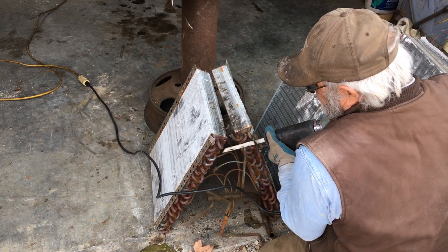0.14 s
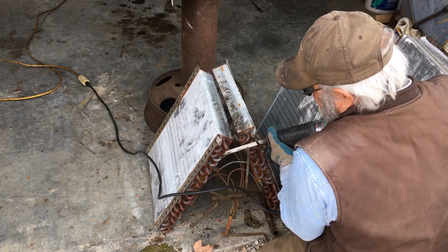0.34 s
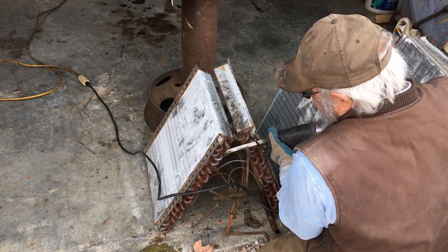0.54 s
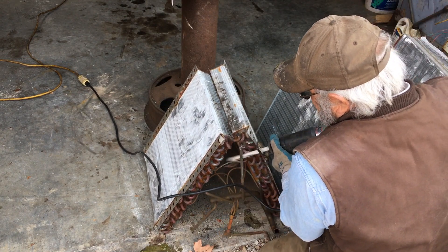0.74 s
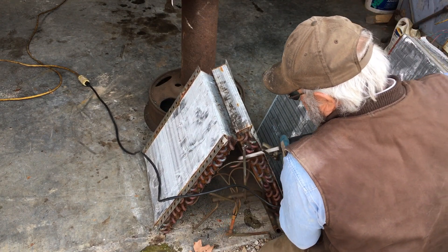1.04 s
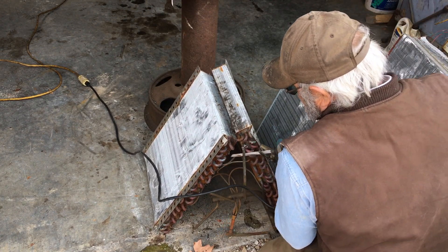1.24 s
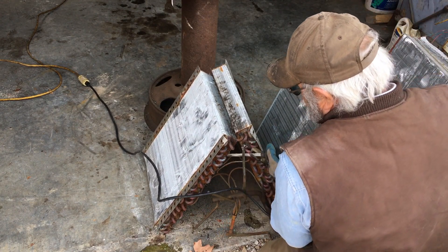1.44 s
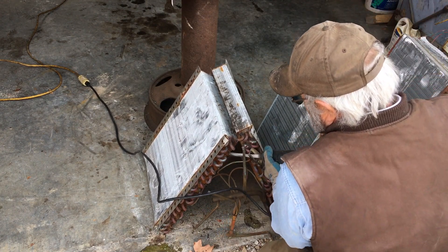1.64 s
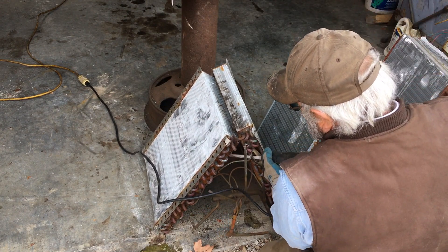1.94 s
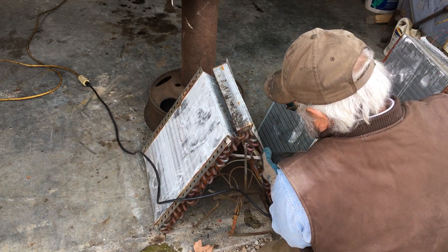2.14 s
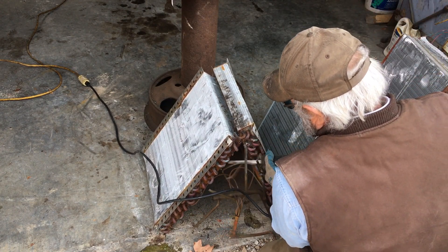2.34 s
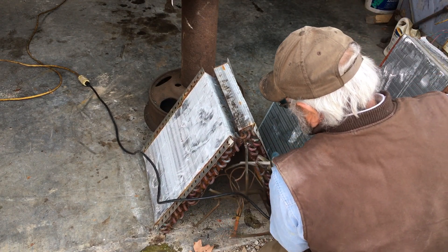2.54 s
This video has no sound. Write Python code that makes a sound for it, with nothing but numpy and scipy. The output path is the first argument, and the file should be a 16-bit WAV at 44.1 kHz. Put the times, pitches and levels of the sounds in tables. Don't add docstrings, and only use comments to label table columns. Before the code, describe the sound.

A reciprocating saw cuts thin copper tubes, close up with a short, dull concrete echo. From 0 to 0.8 s, rapid uneven strokes rasp and rattle the coil, with a hollow honk and low motor hum. Strokes slow into bright blade slaps until 1.3 s. Quiet scrapes and ticking chips follow, with a faint rising squeal near 1.7 s. From 1.8 s cutting resumes, turning clangy and brighter after 2.35 s.

```python
import sys
import numpy as np
from scipy import signal
from scipy.fft import rfft, irfft
from scipy.io import wavfile
from scipy.ndimage import uniform_filter1d

SR = 44100
rng = np.random.default_rng(int(sys.argv[2]) if len(sys.argv) > 2 else 0)


def int16_out(signal):
    q = np.round(np.clip(np.atleast_2d(signal).T, -1, 1) * 32767)
    wavfile.write(sys.argv[1], SR, q.astype(np.int16))


def invert_db(level):
    return 10 ** (np.asarray(level, dtype=float) / 20)


N = 119070

# (time [s], rasp level [dB], brightness [dB], motor level [dB])
LOAD = [(0, -24.5, -7.5, -49), (.045, -31.5, 3, -48), (.08, -31, 3, -49), (.3, -24, 2.5, -46),
        (.45, -28.5, 2, -39.5), (.55, -28.5, 0.5, -44), (.62, -29, 3, -43), (.8, -31, 1, -43),
        (.9, -29.5, 7, -59.5), (1.1, -33.5, 0.5, -53.5), (1.3, -41, 2.5, -60), (1.57, -42.5, -2, -55.5),
        (1.66, -45, -8, -59.5), (1.72, -37.5, 5.5, -53), (1.8, -32, 1, -58), (2.15, -27, 3, -50),
        (2.32, -29.5, 3, -51.5), (2.7, -34, 9, -56)]
# (time [s], hiss peak [dB], coil jolt [dB])
FIRST_TUBE = [(0.059, -16, -23), (0.094, -12.5, -5), (0.137, -22, 11), (0.164, -14, 0), (0.186, -13, -17),
              (0.1993, -12, -10), (0.2126, -11, -16), (0.243, -7, -23), (0.2612, -7, -21), (0.277, -8, -8),
              (0.299, -14, -23), (0.311, -20, -18), (0.347, -7, -20), (0.3847, -11, 4.5),
              (0.4244, -15, -16), (0.4584, -10.5, -26), (0.492, -17, -21), (0.53, -10, 1), (0.553, -13, 2),
              (0.6486, -31, 1), (0.669, -16, -14), (0.726, -14, -25), (0.771, -12, 4.5), (0.8104, -33, 0)]
# (time [s], hiss peak [dB], coil jolt [dB])
SECOND_TUBE = [(1.794, -34, 12), (1.81, -32, -2), (1.85, -27, 2), (1.888, -37, 1), (1.911, -22, 0),
               (1.943, -15.5, -1), (1.9595, -12.5, 0), (2.0674, -16, -8), (2.092, -17, 8),
               (2.117, -29, -13), (2.142, -22, 0), (2.1674, -20, -1), (2.1914, -20, -3), (2.2164, -15, -20),
               (2.2413, -14.5, 10.5), (2.2677, -16, 4), (2.317, -41, 4), (2.3534, -22, -11)]
# (time [s], hiss peak [dB], coil jolt [dB], main low blade mode [dB],
# other modes [dB])
SLOWING = [(0.831, -15.5, 0, -44, -44), (0.855, -18, 4, -46, -41), (0.8698, -14.5, -2, -40, -42),
           (0.894, -13.5, -14, -39, -39), (0.9262, -19, -14, -36, -35), (0.9537, -18, 2, -36, -36),
           (0.9815, -17, -6, -38, -35), (1.008, -31, -3, -45, -42), (1.0384, -16, 4, -42, -35.5),
           (1.073, -14, -1, -38, -30.5), (1.1073, -18, -6, -37, -34.5), (1.157, -32, -8, -55, -46),
           (1.1827, -15, -9, -40, -31.5), (1.2277, -17.5, -21, -43, -35.5), (1.277, -20.5, -11, -43, -44)]
# (time [s], hiss peak [dB], coil jolt [dB], main low blade mode [dB], other modes [dB])
BREAKTHROUGH = [(2.3723, -17, -11, -44, -39), (2.3973, -14, -13, -40, -35), (2.42, -12.5, -6, -41, -33),
                (2.444, -11, -15, -41, -30), (2.469, -15, -8, -33, -30.5), (2.4903, -14, 0, -38, -35),
                (2.5132, -14.5, -5, -34, -32), (2.5421, -13.5, -7, -37, -41), (2.5684, -20, -7, -49, -46),
                (2.596, -18.5, -6, -43, -43), (2.6204, -35, -7, -50, -48), (2.654, -14.5, -22, -42, -41),
                (2.6887, -13, -15, -36.5, -38)]
# (time [s], hiss peak [dB], coil jolt [dB], fall [s], fin ring [dB])
SCRAPES = [(1.297, -25, 2, .007, -35), (1.3364, -25, -2, .01, -35), (1.345, -25, 3, 0.0074, -37),
           (1.3906, -32, -12, .008, -42), (1.397, -27, -20, 0.014, -35), (1.424, -30, -20, .008, -40),
           (1.452, -21.5, -9, .012, -27), (1.5216, -21.5, -14, 0.01, -32.5), (1.5395, -23, -17, .006, -36),
           (1.551, -23, -10, 0.012, -37), (1.614, -28, -20, 0.014, -45), (1.629, -26, -26, 0.0059, -36),
           (1.672, -25, -8, 0.0075, -37), (1.68, -30, -12, 0.008, -42), (1.702, -26, 0, 0.0073, -34),
           (1.707, -20, 4, 0.016, -30), (1.747, -18.5, 2, .014, -46)]
# (time [s], ring [Hz], peak [dB], t60 [s])
PINGS = [(1.5414, 6700, -32, 0.023), (1.6288, 7900, -34, .015), (1.7078, 6560, -26, .012),
         (1.7215, 14600, -30, .015), (1.7591, 1420, -19.5, 0.015), (1.818, 8760, -33, 0.026),
         (1.855, 8840, -28, 0.026), (0.5385, 1030, -21.5, 0.07), (0.004, 1744, -22.5, 0.078),
         (0.185, 1051, -20, 0.11), (0.212, 1050, -20, .1), (0.278, 3290, -20, .04), (0.391, 1646, -18, .04),
         (0.873, 6500, -22.5, .03), (2.076, 1410, -19.5, .05), (2.196, 1840, -21.5, 0.045),
         (1.349, 4700, -31, .03), (1.459, 4190, -29, 0.027), (1.553, 4700, -29, .03),
         (2.244, 1316, -19, 0.034), (2.268, 2560, -18, 0.038)]
# (frequency [Hz], width [Hz], level [dB])
FIRST_COIL_MODES = [(1623, 57, -1.5), (1787, 79, -5), (2392, 88, -4.5), (3380, 50, -6), (5810, 220, -7.5)]
# (frequency [Hz], width [Hz], level [dB])
SECOND_COIL_MODES = [(1081, 26, -7), (1391, 64, 0), (1519, 77, -0.5), (1808, 160, 0), (2100, 40, -4.5),
                     (3395, 270, -3)]
# (frequency [Hz], width [Hz], level [dB])
HONK_MODES = [(926, 45, -11), (1050, 85, -9)]
# (frequency [Hz], level before 2 s [dB], level from 2 s [dB], t60 [s])
BLADE_MODES = [(4720, 5, 4, .03), (4180, -13, -15, .03), (5800, -10, -8, .04), (6370, -12, -5, .05),
               (8140, -9, -9, .035), (8760, -12, -10, .05), (9930, -2, -9, .032), (11950, -2, -2, .025),
               (2780, -20, -3, .05)]
# (frequency [Hz], level [dB], t60 [s])
SQUEAK_MODES = [(7310, -17, .035), (6400, -24, .02), (8040, -26, .03)]
# (frequency [Hz], level [dB])
RASP_SPECTRUM = [(150, -19.5), (400, -11), (850, -3.5), (1050, 1.5), (1800, -1), (3500, -3.5), (7000, -11),
                 (16000, -48)]
# (frequency [Hz], level [dB])
SWARF_SPECTRUM = [(1500, -10.5), (3000, -29.5), (5000, -2.5), (8500, 0), (11500, -2.5), (15800, -6)]
# (frequency [Hz], level [dB])
HISS_SPECTRUM = [(900, -22.5), (1500, -5), (3000, -2.5), (5000, 0.5), (10500, -3.5), (15800, -5.5)]
# (frequency [Hz], level [dB])
RUMBLE_SPECTRUM = [(15, -43), (25, -21), (59, 5.5), (113, -5), (151, 0.5), (360, -4.5), (400, -31),
                   (520, -39), (880, -120)]
# (frequency [Hz], width [Hz], depth [dB])
FLOOR_DIPS = [(4880, 240, -5), (7560, 130, -3), (10380, 390, -3)]

TEETH_PER_S, TOOTH_SCATTER_DB = 16000, 0.5
RISE_S, HISS_FALL_S, SLAP_FALL_S, JOLT_FALL_S = 0.0015, 0.0073, 0.0062, 0.009
HISS_DB, JOLT_DB, JOLT_LOW_HZ, FLICKER_DB = -8, -16.5, 890, 1
MOVE_S, MOVE_LEN_S, COIL_MODES_DB = 0.77, 0.3, -8
HONK_S, HONK_SPAN_S = 0.36, 0.36
REHONK_S, REHONK_SPAN_S, REHONK_DB = 1.83, 0.07, -2
SWARF_DB, SWARF_FLICKER_DB, SWARF_SPLIT_HZ = -8.5, 2, 8000
FIN_HZ, FIN_WIDTH_HZ = 3750, 600
SQUEAL_S, SQUEAL_LEN_S, SQUEAL_HZ, SQUEAL_RISE_HZ, SQUEAL_DB = 1.715, 0.069, 2070, 586, -33
PUSH_S, RING_DB, RING_SCATTER_DB, DAMPED_RING_DB = 0.001, 7, 1.5, -33
LOW_MODE_HZ, LOW_MODE_T60_S, LOW_MODE_DB, SECOND_CUT_S = 3078, 0.065, 3, 2
SQUEAK_S, SQUEAK_LEN_S = 0.097, 0.009
MAINS_HZ, HUM_DB, HUM_WOBBLE_DB, RUMBLE_DB = 112.7, -2, 4.5, -0.5
ARMATURE_HZ, ARMATURE_WIDTH_HZ, ARMATURE_DB = 438, 12, -5
ROOM_T60_S, ROOM_DB, ROOM_HZ = 0.2, -17.5, 4060
LOW_CUT_HZ, TOP_HZ = 35, 15900


def cutting(t, rasp_db, bright_db):
    s, hiss_db, jolt_db, _, _, fall_s = strokes()
    jolts = bursts(t, s, hiss_db + jolt_db + JOLT_DB, np.full(len(s), JOLT_FALL_S))
    hiss = bursts(t, s, hiss_db + HISS_DB, fall_s) * colour(teeth(), HISS_SPECTRUM)
    body = coil(t, teeth())
    thin_body = filtered(body, JOLT_LOW_HZ, "high")
    rasp = invert_db(rasp_db + FLICKER_DB * walk(48)) * body
    return rasp + jolts * thin_body + swarf(rasp_db, bright_db) + hiss


def strokes():
    def damped(s, hiss_db, jolt_db, fall_s):
        ring_db = hiss_db + DAMPED_RING_DB
        return s, hiss_db, jolt_db, ring_db, ring_db, fall_s

    deep = [damped(*row, HISS_FALL_S) for row in FIRST_TUBE + SECOND_TUBE]
    slaps = [(*row, SLAP_FALL_S) for row in SLOWING + BREAKTHROUGH]
    scrapes = [damped(*row[:4]) for row in SCRAPES]
    return np.array(deep + slaps + scrapes).T


def teeth():
    hit, size, sign = rng.random(N), rng.exponential(size=N), rng.standard_normal(N)
    miss = (hit * SR / TEETH_PER_S - 1) * 20
    catch = 1 / (1 + np.exp(np.clip(miss, -50, 50)))
    return unit(catch * sign * invert_db(TOOTH_SCATTER_DB * size))


def coil(t, x):
    def resonances(modes):
        return sum(invert_db(db + 1.44 * walk(16)) * unit(ring(ring(x, hz, width_hz), hz, width_hz))
                   for hz, width_hz, db in modes)

    def bell(centre_s, span_s):
        return np.exp(-((t - centre_s) / span_s) ** 2)

    moved = np.clip((t - MOVE_S) / MOVE_LEN_S, 0, 1)
    honk_level = bell(HONK_S, HONK_SPAN_S) + invert_db(REHONK_DB) * bell(REHONK_S, REHONK_SPAN_S)
    honk = honk_level * resonances(HONK_MODES)
    first = resonances(FIRST_COIL_MODES) * np.sqrt(1 - moved)
    second = resonances(SECOND_COIL_MODES) * np.sqrt(moved)
    return colour(x, RASP_SPECTRUM) + honk + invert_db(COIL_MODES_DB) * (first + second)


def swarf(rasp_db, bright_db):
    coarse = filtered(colour(teeth(), SWARF_SPECTRUM), SWARF_SPLIT_HZ, "low")
    fine = filtered(colour(teeth(), SWARF_SPECTRUM), SWARF_SPLIT_HZ, "high")
    shared_db = rasp_db + SWARF_DB + SWARF_FLICKER_DB * walk(52)
    coarse_db = shared_db + 0.58 * bright_db + 2.3 * walk(57)
    fine_db = shared_db + 1.0 * bright_db + 0.52 * walk(47)
    return invert_db(coarse_db) * coarse + invert_db(fine_db) * fine


def scrape(t):
    s, _, _, fall_s, fin_db = np.array(SCRAPES).T
    drag = bursts(t, s, fin_db, fall_s) * unit(ring(teeth(), FIN_HZ, FIN_WIDTH_HZ))
    pings = sum(struck([at], db, hz, t60_s) for at, hz, db, t60_s in PINGS)
    u = np.clip((t - SQUEAL_S) / SQUEAL_LEN_S, 0, 1)
    squeal_hz = SQUEAL_HZ + SQUEAL_RISE_HZ * u + 60 * walk(243)
    tone = np.sin(2 * np.pi * np.cumsum(squeal_hz) / SR)
    squeal = invert_db(SQUEAL_DB + 4.5 * walk(200)) * np.sin(np.pi * u) * tone
    return drag + pings + squeal


def blade(t):
    s, _, _, low_db, other_db, _ = strokes()
    out = struck(s + PUSH_S, low_db + RING_DB + LOW_MODE_DB, LOW_MODE_HZ, LOW_MODE_T60_S)
    for hz, first_db, second_db, t60_s in BLADE_MODES:
        late, size = rng.random((len(s), 2)).T
        mode_db = np.where(s < SECOND_CUT_S, first_db, second_db) + RING_SCATTER_DB * (2 * size - 1)
        out += struck(s + PUSH_S * (1 + late), other_db + RING_DB + mode_db, hz, t60_s)
    return out + squeak(t)


def squeak(t):
    rub = np.exp(-((t - SQUEAK_S) / SQUEAK_LEN_S - 0.5) ** 2 * 8)
    out = np.zeros(N)
    for hz, db, t60_s in SQUEAK_MODES:
        drive = rub * np.sin(2 * np.pi * hz * t) / rub.sum() * 2
        out += invert_db(db) * ring(drive, hz, decay_width_hz(t60_s))
    return out


def motor(load_db):
    hum_hz = MAINS_HZ * (1 + 0.026 * walk(5.2))
    hum = invert_db(HUM_DB + HUM_WOBBLE_DB * walk(24)) * np.sin(2 * np.pi * np.cumsum(hum_hz) / SR)
    whirr = invert_db(ARMATURE_DB) * unit(ring(rng.standard_normal(N), ARMATURE_HZ, ARMATURE_WIDTH_HZ))
    rumble = invert_db(RUMBLE_DB) * colour(rng.standard_normal(N), RUMBLE_SPECTRUM + [(900, -66)])
    return invert_db(load_db) * (hum + rumble + whirr)


def room(t, near):
    u = t[:SR // 2]
    pole = np.exp(-2 * np.pi * ROOM_HZ / SR)
    tail = signal.lfilter([1], [1, -pole], rng.standard_normal(len(u))) * invert_db(-60 * u / ROOM_T60_S)
    tail = invert_db(ROOM_DB) * tail / np.sqrt(np.sum(tail ** 2))
    return signal.fftconvolve(near, tail)[:N]


def bursts(t, starts_s, gains_db, falls_s):
    out = np.zeros(N)
    for s, db, fall_s in zip(starts_s, gains_db, falls_s):
        i = int(s * SR)
        span = slice(i, i + SR // 8)
        u = np.maximum(t[span] - s, 0)
        rise = 1 - np.exp(-u / RISE_S * (HISS_FALL_S / fall_s) ** 2)
        out[span] += invert_db(db) * rise * np.exp(-u / fall_s)
    return out


def struck(s, gains_db, hz, t60_s):
    slap = np.zeros(N)
    slap[(np.asarray(s) * SR).astype(int)] = invert_db(gains_db)
    return ring(slap, hz, decay_width_hz(t60_s))


def decay_width_hz(t60_s):
    return np.log(1000) / np.pi / t60_s


def ring(x, hz, width_hz):
    r = np.exp(-np.pi * width_hz / SR)
    w = 2 * np.pi * hz / SR
    return signal.lfilter([0, np.sin(w)], [1, -2 * r * np.cos(w), r * r], x)


def filtered(x, hz, kind):
    return signal.sosfilt(signal.butter(2, hz, kind, fs=SR, output="sos"), x)


def colour(x, points):
    hz, db = np.array(points).T
    f = np.maximum(np.fft.rfftfreq(N, 1 / SR), 1)
    gain = invert_db(np.interp(np.log(f), np.log(hz), db))
    return unit(irfft(rfft(x) * gain, N))


def walk(rate_hz):
    k = int(SR / rate_hz)
    return unit(uniform_filter1d(uniform_filter1d(rng.standard_normal(N), k), k))


def unit(x):
    return x / np.sqrt(np.mean(x ** 2))


def scene():
    t = np.arange(N) / SR
    load = np.array(LOAD)
    rasp_db, bright_db, load_db = (np.interp(t, load[:, 0], column) for column in load[:, 1:].T)
    near = cutting(t, rasp_db, bright_db) + scrape(t) + blade(t)
    return (near + room(t, near) + motor(load_db))[None]


def top_cut(x):
    return signal.sosfilt(signal.butter(12, 16470, fs=SR, output="sos"), x)


def record(dry):
    f = np.fft.rfftfreq(N, 1 / SR)
    dips_db = sum(db * np.exp(-((f - hz) / width_hz) ** 2) for hz, width_hz, db in FLOOR_DIPS)
    edges = (f < TOP_HZ) / (1 + (LOW_CUT_HZ / np.maximum(f, 1)) ** 6)
    mix = irfft(rfft(dry) * invert_db(dips_db) * edges, N)
    return top_cut(mix)


dry = scene()
out = record(dry)
int16_out(out)
```